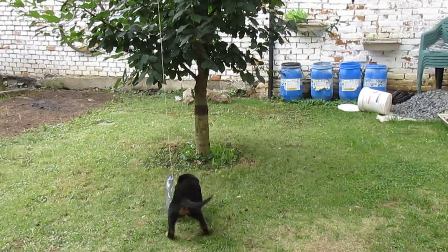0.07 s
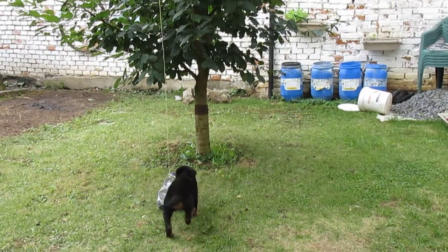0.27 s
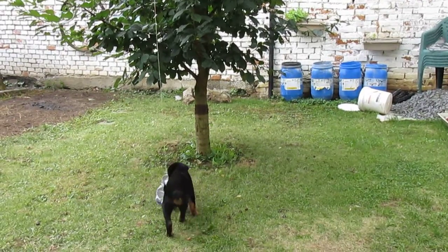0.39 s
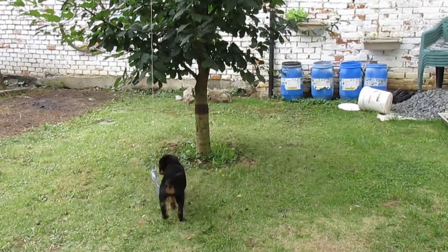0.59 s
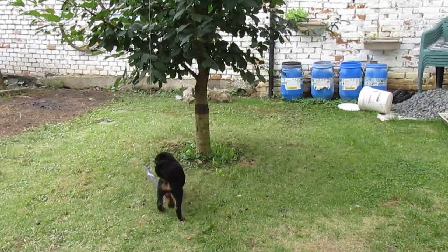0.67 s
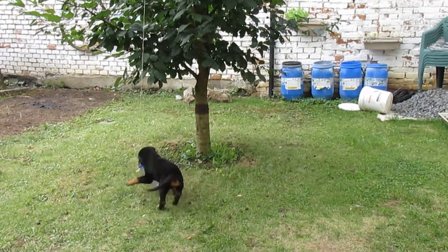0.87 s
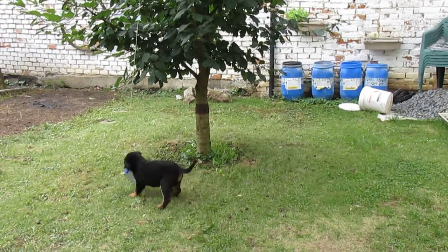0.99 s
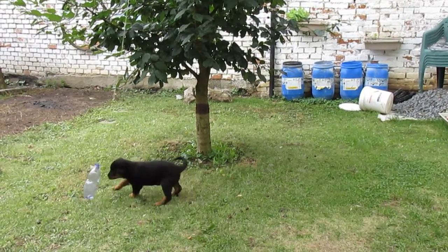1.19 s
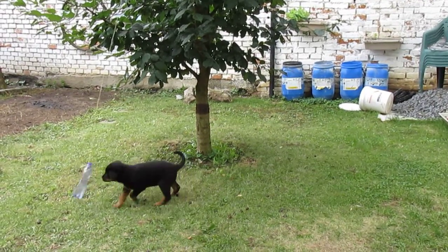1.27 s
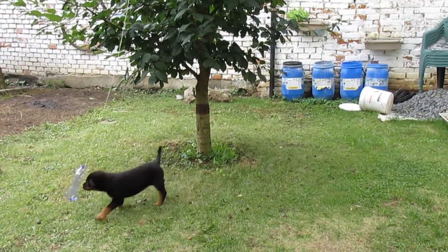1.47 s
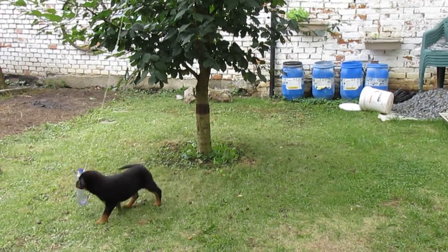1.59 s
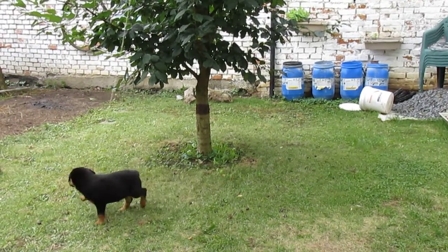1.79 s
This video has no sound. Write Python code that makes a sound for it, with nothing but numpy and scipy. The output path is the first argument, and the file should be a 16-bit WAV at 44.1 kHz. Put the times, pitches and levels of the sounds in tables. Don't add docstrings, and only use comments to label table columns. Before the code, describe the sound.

Faint bottle taps and grass rustle open quietly, then low gusts rumble and thud across the stereo microphone, mostly left; midway an empty plastic bottle clacks crisply, leaves hiss softly, and the wind finally dies down.

```python
import sys
import numpy as np
from scipy import signal
from scipy.fft import rfft, irfft
from scipy.io import wavfile
from scipy.ndimage import uniform_filter1d

SR = 44100
rng = np.random.default_rng(int(sys.argv[2]) if len(sys.argv) > 2 else 0)


def voltage_ratio(level):
    return 10 ** (np.asarray(level, float) / 20)


def to_wav(s):
    ch = np.atleast_2d(s).T
    pcm = np.round(np.clip(ch, -1, 1) * 32767)
    wavfile.write(sys.argv[1], SR, pcm.astype(np.int16))


N = 79380

# frequency in Hz, level in dB.
AIR_COLOUR = [(30, 2), (150, 0), (400, -9), (1000, -19), (2500, -27), (6000, -31), (10000, -34),
              (16000, -34)]
# time in seconds, level in dB.
LEAF_STIR = [(0.0, -62), (0.071, -52), (0.154, -58.5), (0.274, -52.5), (0.333, -63.5), (0.707, -61.5),
             (0.736, -51.5), (0.836, -62), (1.168, -58.5), (1.192, -50.5), (1.238, -65), (1.332, -56),
             (1.378, -66), (1.738, -59.5), (1.8, -63.5)]
# middle in seconds, rise in dB, length in seconds.
TWIG_FLICKS = [(0.039, 3, .02), (0.191, 3, 0.056), (.43, 3.5, 0.06), (0.617, 6, .02), (.94, 7, 0.017),
               (.98, 6.5, 0.027), (1.022, 5, 0.055), (1.097, 2, 0.04), (1.126, 2.5, 0.046), (1.292, 1, .03),
               (1.55, 3.5, 0.026), (1.634, 10, 0.017), (1.658, 4, 0.039)]
# frequency in Hz, level in dB.
LEAF_TONE = [(3000, -16), (5000, -14.5), (7000, -7), (9000, -2), (11000, -5), (13000, -13.5), (16000, -26)]
# middle in seconds, level in dB, length in seconds.
GRASS_BRUSHES = [
    (0.104, -62, 0.52),
    (0.275, -54.5, 0.15),
    (0.63, -74, 0.021),
    (0.712, -59, 0.092),
    (1.018, -61, 0.037),
    (1.206, -56.5, 0.075),
    (1.327, -62.5, 0.11),
    (1.649, -62, .04),
]
# frequency in Hz, level in dB.
GRASS_TONE = [(500, -8), (2000, 6.5), (5000, 2), (9000, -4), (12000, 3), (16000, -24)]
# time in seconds, left level in dB, right level in dB.
BREEZE_LEVELS = [(0, -56, -37.5), (.13, -66, -57.5), (0.222, -21.5, -19), (.3, -21.5, -24), (.48, -28, -35),
                 (.58, -31, -23), (.65, -28, -33), (.72, -21, -30), (.8, -23.5, -39), (1.0, -19, -29),
                 (1.151, -23, -22), (1.24, -24, -28.5), (1.33, -12, -11.5), (1.38, -32, -32),
                 (1.42, -39.5, -60), (1.55, -48, -40), (1.7, -49.5, -46.5), (1.8, -53, -44)]
# middle in seconds, level in dB, centre in Hz, length in seconds.
LEFT_EDDIES = [(.205, -20, 74.4, 0.05), (.233, -17, 100, 0.029), (.265, -6, 67.6, 0.062),
               (.295, -20.5, 95, 0.09), (.327, -25.5, 86, 0.14), (.364, -8, 110, 0.023),
               (.39, -14.5, 95, 0.13), (.43, -14.5, 104, 0.14), (.462, -17, 129, 0.067),
               (.512, -21, 60, 0.032), (.555, -9.5, 98, 0.061), (.596, -12, 120, 0.075),
               (.634, -33, 110, 0.018), (.687, -26, 70, 0.05), (.753, -3, 61, 0.053),
               (.792, -4, 113, 0.018), (.826, -5, 94, 0.07), (.855, -12.5, 114, 0.085),
               (.895, -15, 90.5, 0.23), (.95, -7, 129, 0.078), (.981, -3.5, 113.6, 0.033),
               (1.011, -17.5, 169, 0.075), (1.045, -10.5, 112, 0.1), (1.115, -18, 44.7, 0.16),
               (1.2, -16, 116.4, 0.093), (1.277, -11.5, 120, 0.058), (1.343, -11, 71, 0.061),
               (1.37, -19.5, 79, 0.047), (1.423, -34, 49, 0.19), (1.59, -54, 54.3, 0.061)]
# middle in seconds, level in dB, centre in Hz, length in seconds.
RIGHT_EDDIES = [(.174, -22, 60, 0.096), (.229, -19, 73.4, 0.1), (.266, -27, 101, 0.015),
                (.316, -26, 126, 0.068), (.347, -17.5, 111, 0.075), (.397, -28, 89, 0.07),
                (.466, -36, 171, 0.026), (.562, -19.5, 115, 0.13), (.636, -19, 127, 0.02),
                (.677, -20, 102, 0.021), (.775, -19, 150, 0.047), (.827, -12.5, 109, 0.082),
                (.858, -15, 99, 0.025), (.956, -26, 149, 0.015), (.994, -31, 101, 0.017),
                (1.03, -25, 98, 0.027), (1.06, -23.5, 138, 0.09), (1.087, -31, 77, 0.059),
                (1.183, -23, 81, .05), (1.212, -21.5, 90, 0.074), (1.282, -10.5, 88, 0.057),
                (1.325, -7.5, 143.6, 0.027), (1.461, -33, 48.5, 0.04), (1.571, -17, 48, 0.045),
                (1.607, -20, 50.4, 0.073)]
# middle in seconds, level in dB, centre in Hz, length in seconds.
LEFT_SNAPS = [
    (0.357, -35, 150, 0.016),
    (0.403, -23, 253, 0.018),
    (0.441, -22, 150, 0.025),
    (.466, -17.5, 163, 0.018),
    (0.55, -17.5, 120, 0.027),
    (0.958, -27.5, 580, 0.011),
    (1.079, -22.5, 139, 0.1),
    (1.019, -27, 247, 0.035),
    (1.272, -26, 177, 0.016),
]
# middle in seconds, level in dB, centre in Hz, length in seconds.
RIGHT_SNAPS = [
    (1.318, -15.5, 159, 0.026),
    (0.49, -34, 130, 0.0058),
]
# start in seconds, level in dB, contact brightness in Hz, rattle length in seconds.
BOTTLE_KNOCKS = [(.001, -47, 460, 0.012), (0.015, -50.5, 437, 0.003), (0.036, -47.5, 444, 0.0026),
                 (.049, -49, 448, 0.006), (.138, -48, 610, 0.0018), (0.145, -48.5, 1090, 0.0086),
                 (0.199, -47.5, 500, 0.0063), (0.2212, -41.5, 1900, .007), (.225, -42.5, 750, 0.004),
                 (0.7618, -25.5, 4200, .009), (.766, -29, 1790, 0.0072), (.771, -29.5, 820, 0.0011),
                 (.779, -39.5, 2040, 0.0068), (.787, -33.5, 990, 0.0035), (0.792, -43, 2510, 0.0099),
                 (0.809, -55, 2500, 0.0087), (1.096, -48, 2340, 0.025), (1.262, -52, 2000, 0.015),
                 (1.345, -52, 2570, 0.0044)]
# frequency in Hz, level in dB, 60 dB decay in seconds.
HOLLOW_MODES = [(384, -13, .15), (450, -22, .04), (553, -15, .13), (648, -17, .06)]
# frequency in Hz, level in dB, 60 dB decay in seconds.
WALL_MODES = [(997, -26, 0.087), (1056, -29, 0.074), (1162, -21, 0.036), (1264, -23, 0.025),
              (1464, -21, 0.027), (1583, -14, 0.018), (1918, -20, 0.049), (2050, -17.5, 0.036),
              (2823, -18, .045), (3080, -20.5, .025)]
# middle in seconds, peak in dB, swing rate in Hz.
VORTEX_PASSES = [
    (.352, -5, 194),
    (.3655, -1.5, 149),
    (.404, -20, 320),
    (.465, -14.5, 213),
    (.534, -20.5, 194),
    (0.556, -7.5, 218),
    (0.5641, -2.5, 121),
    (.609, -11, 150),
    (.958, -27.5, 770),
]


def rms_one(x):
    return x / np.sqrt(np.mean(x ** 2) + 1e-20)


def filtered(x, order, hz, kind="low"):
    return signal.sosfilt(signal.butter(order, hz, kind, fs=SR, output="sos"), x)


def coloured(points, white):
    hz, db = np.transpose(points)
    bins_hz = np.maximum(np.fft.rfftfreq(N, 1 / SR), 1)
    gain = voltage_ratio(np.interp(np.log(bins_hz), np.log(hz), db))
    return rms_one(irfft(rfft(white) * gain, N))


def drift(rate_hz):
    r = np.exp(-2 * np.pi * rate_hz / SR)
    return rms_one(signal.lfilter([1], [1, -2 * r, r * r], rng.standard_normal(N + SR))[SR:])


def swell(middle_s, length_s):
    phase = (np.arange(N) / SR - middle_s) / length_s
    return np.cos(np.pi * np.clip(phase, -.5, .5)) ** 2


def air():
    shared = 0.52
    white = rng.standard_normal((3, N))
    sway_db = .8 * drift(4)
    return voltage_ratio(-49 + sway_db) * coloured(AIR_COLOUR, white[:2] + 2 * shared * white[2])


def leaves():
    s, db = np.transpose(LEAF_STIR)
    stir_db = np.interp(np.arange(N) / SR, s, db)
    flutter_db = 0.86 * drift(36)
    twigs_db = sum(rise_db * swell(at_s, length_s) for at_s, rise_db, length_s in TWIG_FLICKS)
    level = voltage_ratio(stir_db + flutter_db + twigs_db)
    side_gain = voltage_ratio(np.array([[5.5], [-7.5]]))
    grains = rng.standard_normal((2, N)) * voltage_ratio(1.06 * drift(410))
    return level * side_gain * coloured(LEAF_TONE, grains)


def grass():
    strokes = sum(voltage_ratio(db) * swell(s, length_s) for s, db, length_s in GRASS_BRUSHES)
    grains = rng.standard_normal(N) * voltage_ratio(2.0 * drift(450))
    return strokes * coloured(GRASS_TONE, grains)


def turbulence(white, hz):
    rise, fall, knee = 0.49, 5.69, 1.454
    f = np.fft.rfftfreq(len(white), 1 / SR) / hz
    return rms_one(irfft(rfft(white) * f ** rise / (1 + (f / knee) ** fall), len(white)))


def eddy(white, hz, length_s):
    evening, surge = .55, 0.53
    size = len(white)
    x = turbulence(white, hz)
    half_cycle = int(SR / hz / 2)
    power_now = uniform_filter1d(uniform_filter1d(x ** 2, half_cycle), half_cycle)
    x = x / (np.sqrt(power_now) + 0.3) ** evening
    t = (np.arange(size) - size // 2) / SR
    lump = np.cos(np.pi * np.clip(t / length_s, -.5, .5)) ** 2
    passed = np.cumsum(np.exp(surge * (lump ** 2 - .6)))
    x = lump * np.interp(passed - passed[size // 2] + size // 2, np.arange(size), x)
    return x * np.sqrt(np.sum(lump ** 2) / np.sum(x ** 2))


def port_wind(eddies, breeze_db):
    size = 8192
    out = np.zeros(N + size)
    for s, db, hz, length_s in eddies:
        start = int(s * SR)
        puff = eddy(rng.standard_normal(size), hz, length_s)
        out[start:start + size] += voltage_ratio(db - 2.0) * puff[:N + size - start]
    breeze = voltage_ratio(breeze_db + 2 * drift(27)) * turbulence(rng.standard_normal(N), 60)
    return out[size // 2:size // 2 + N] + breeze


def knock_contacts():
    t = np.arange(N) / SR
    touch = np.zeros((2, N))
    for s, db, hz, rattle_s in BOTTLE_KNOCKS:
        since = np.maximum(t - s, 0)
        rattle = (t >= s) * np.exp(-since / rattle_s * 1.26) * (t < s + 3 * rattle_s)
        contacts = rng.standard_normal((2, N)) * rattle
        contacts[:, int(s * SR)] += 1.7 * np.sqrt(rattle_s * SR) / 4
        contacts = filtered(contacts, 2, hz)
        touch += voltage_ratio(db) * contacts / np.sqrt(np.sum(contacts ** 2) * hz / 8000)
    return touch


def bottle():
    touch = knock_contacts()
    ring = np.zeros(N)
    for k, (hz, db, t60_s) in enumerate(HOLLOW_MODES + WALL_MODES):
        t60_s = min(t60_s, 70 / hz)
        r, w = voltage_ratio(-60 / (t60_s * SR)), 2 * np.pi * hz / SR
        resonator = [1, -2 * r * np.cos(w), r * r]
        ring += signal.lfilter([0, voltage_ratio(db) * np.sin(w)], resonator, touch[k % 2] + 1e-18)
    crack = filtered(touch[0], 2, 900, "high")
    return filtered(ring, 2, 300, "high") + voltage_ratio(14.5) * crack


def yard(x):
    t60_s, first_echo_s = 0.31, .006
    t = np.arange(SR // 2) / SR
    echoes = rng.standard_normal((2, len(t))) * voltage_ratio(-60 * t / t60_s) * (t > first_echo_s)
    echoes = filtered(echoes, 1, 5500)
    echoes = echoes / np.sqrt(np.sum(echoes ** 2) / 2)
    return voltage_ratio(-11) * signal.fftconvolve(x[None], echoes, axes=1)[:, :N]


def vortices():
    out = np.zeros(N)
    for s, db, hz in VORTEX_PASSES:
        u = (np.arange(N) / SR - s) * hz * 1.92
        out += -4 * voltage_ratio(db) * u / (1 + u ** 2) ** 4
    return out


def scene():
    s, left_db, right_db = np.transpose(BREEZE_LEVELS)
    t = np.arange(N) / SR
    left_wind = port_wind(LEFT_EDDIES + LEFT_SNAPS, np.interp(t, s, left_db)) + vortices()
    right_wind = port_wind(RIGHT_EDDIES + RIGHT_SNAPS, np.interp(t, s, right_db))
    near = bottle() * 0.87 + grass() * 0.67
    spread = voltage_ratio(-23) * np.roll(near, 40) * [[1], [-1]]
    return np.array([left_wind, right_wind]) + near + yard(near) + spread + leaves() + air()


def band_limit(x):
    return signal.sosfilt(signal.butter(12, 15890, fs=SR, output="sos"), x)


def record(dry):
    cross = filtered(dry[::-1], 1, 550)
    x = dry - .44 * cross
    x = np.array([np.roll(x[0], -2), x[1]])
    notch_hz, notch_width_hz = 7660, 50
    x = signal.lfilter(*signal.iirnotch(notch_hz, notch_hz / notch_width_hz, fs=SR), x)
    whine_hz, whine_db = 15734, -88
    x = x + voltage_ratio(whine_db) * np.sin(2 * np.pi * whine_hz * np.arange(N) / SR)
    x = x / (1 + (x / .92) ** 8) ** .125
    x = signal.sosfilt(signal.ellip(10, .5, 70, 15800, fs=SR, output="sos"), x)
    return band_limit(x)


dry = scene()
out = record(dry)
to_wav(out)
```